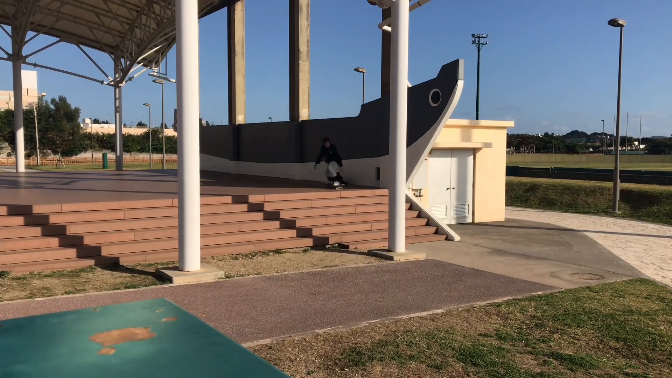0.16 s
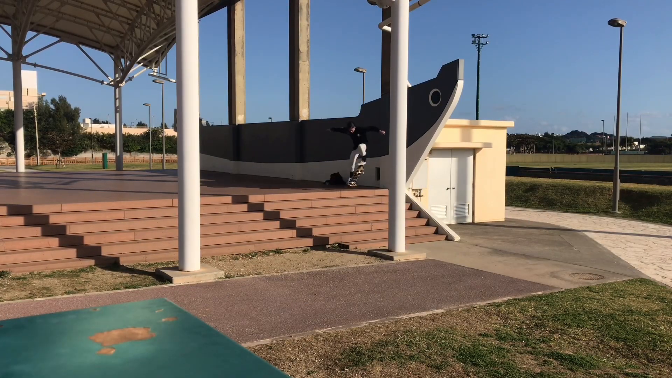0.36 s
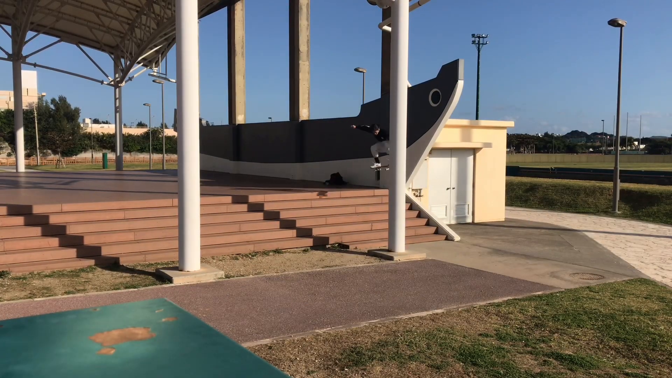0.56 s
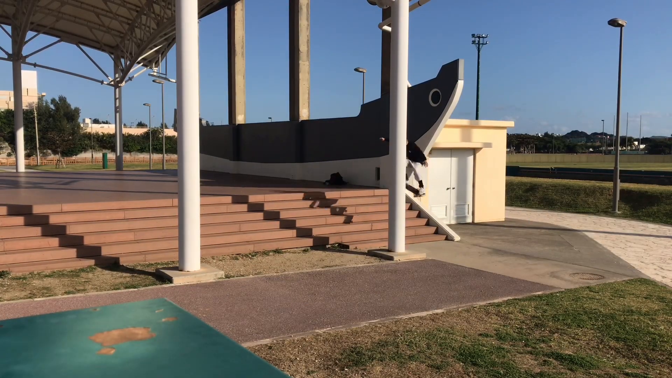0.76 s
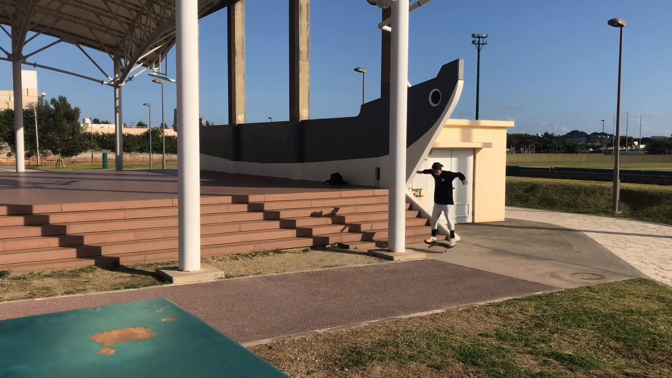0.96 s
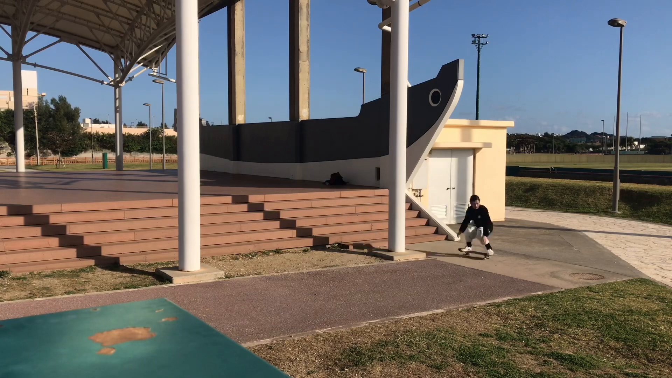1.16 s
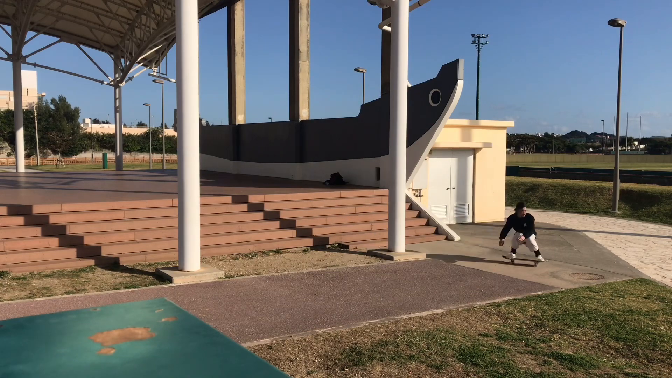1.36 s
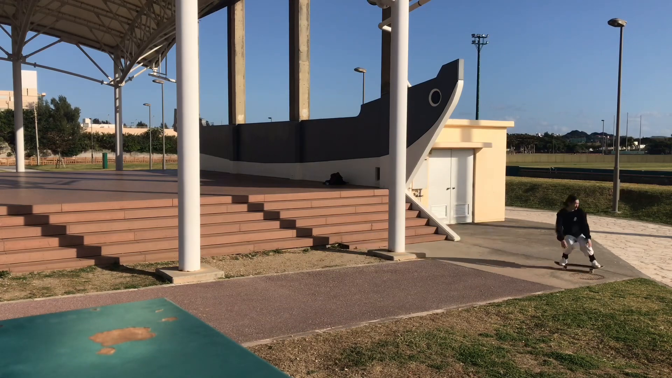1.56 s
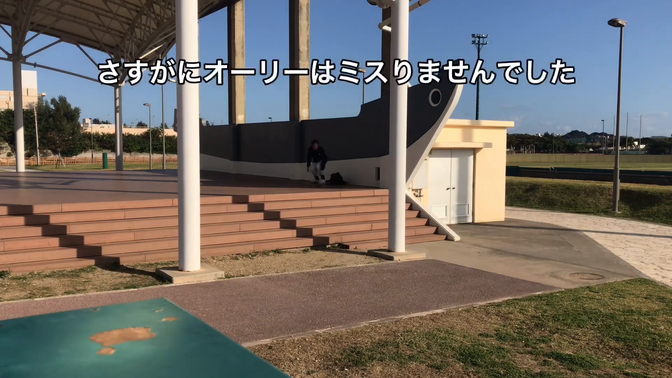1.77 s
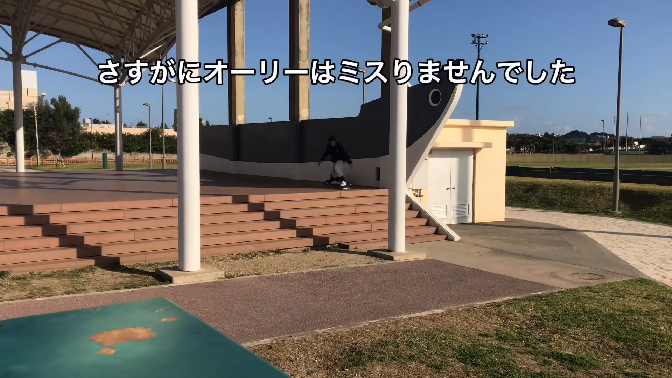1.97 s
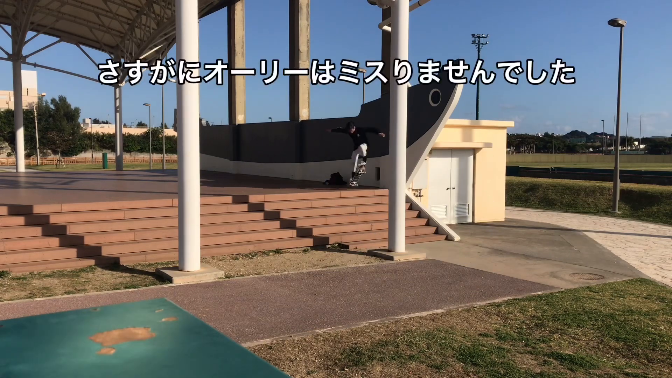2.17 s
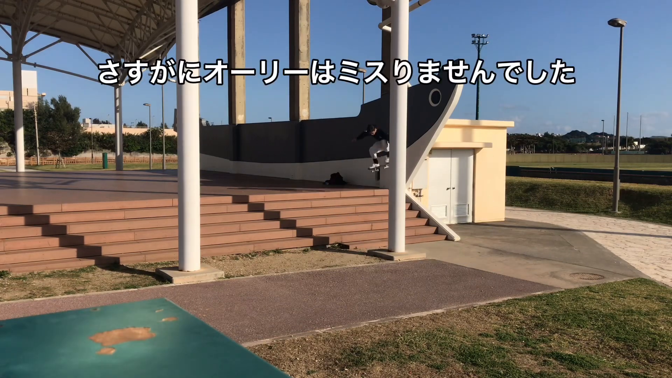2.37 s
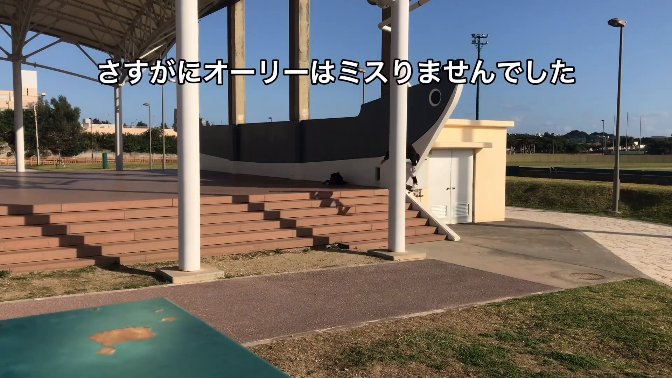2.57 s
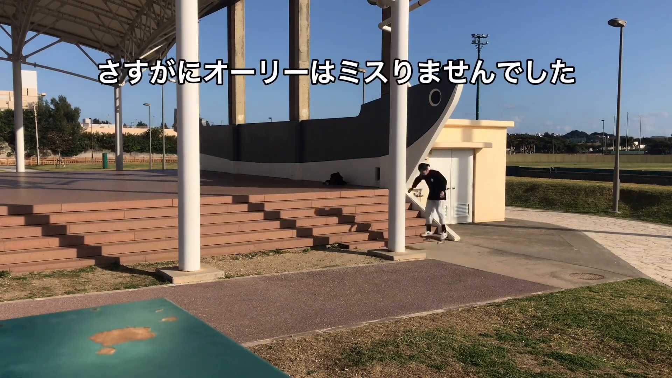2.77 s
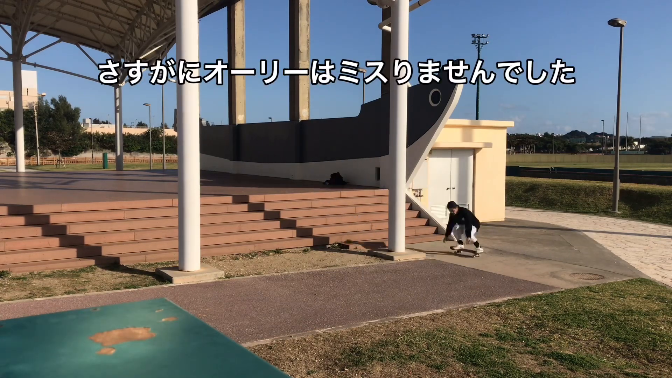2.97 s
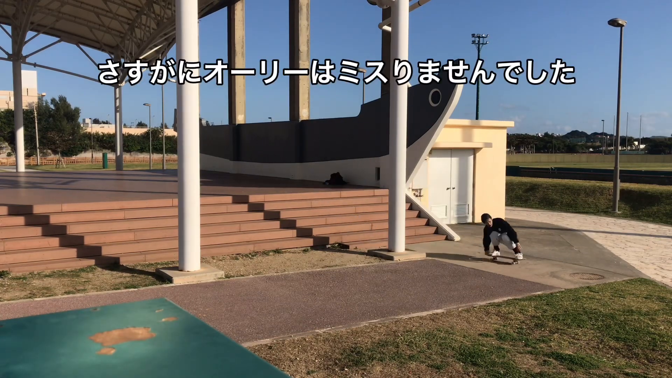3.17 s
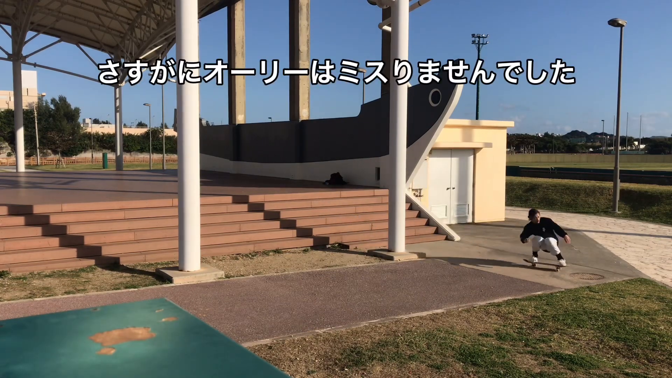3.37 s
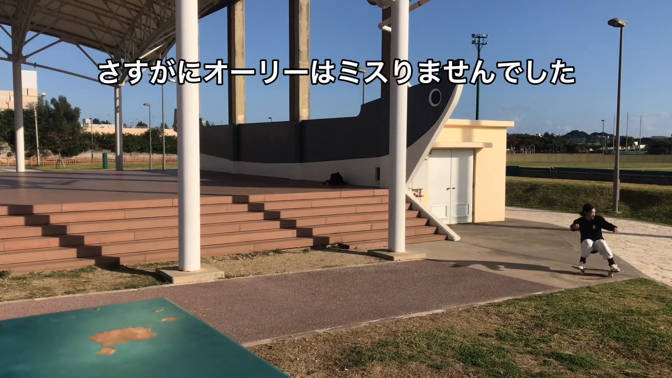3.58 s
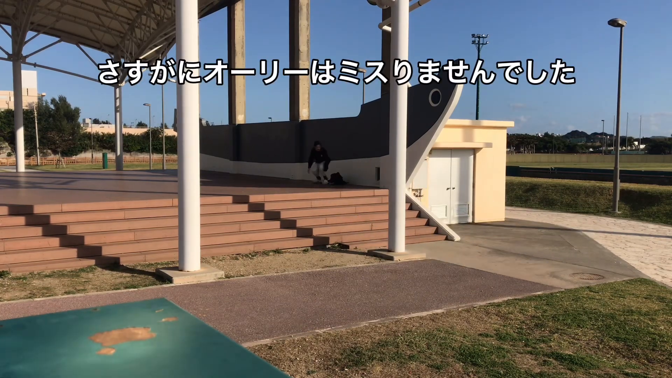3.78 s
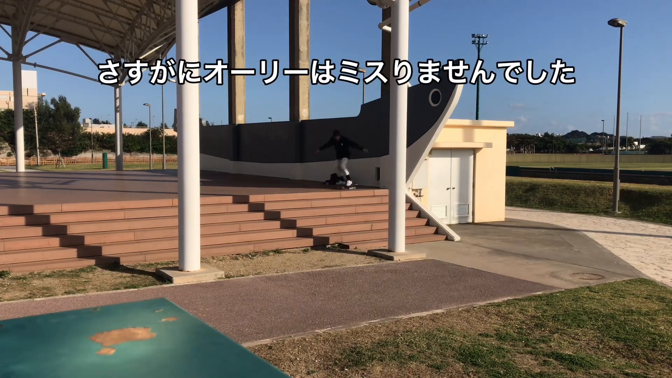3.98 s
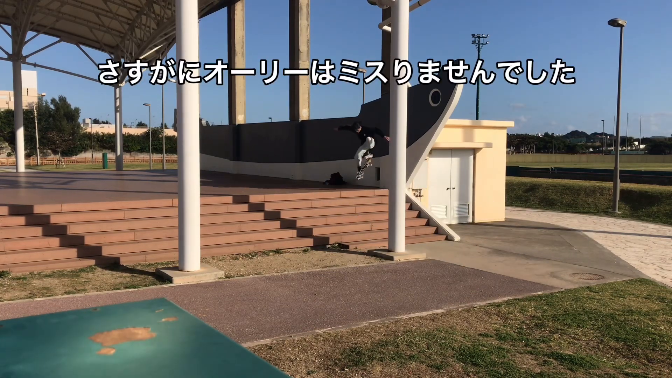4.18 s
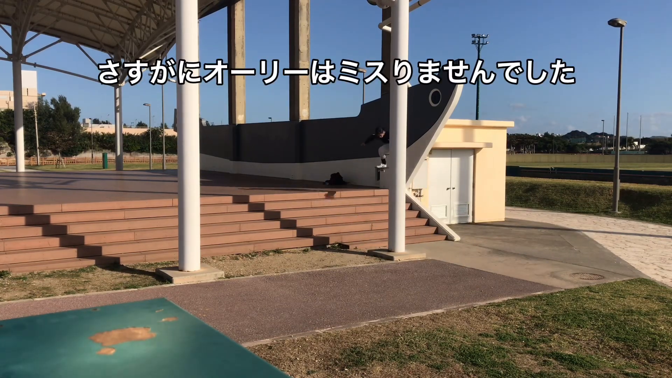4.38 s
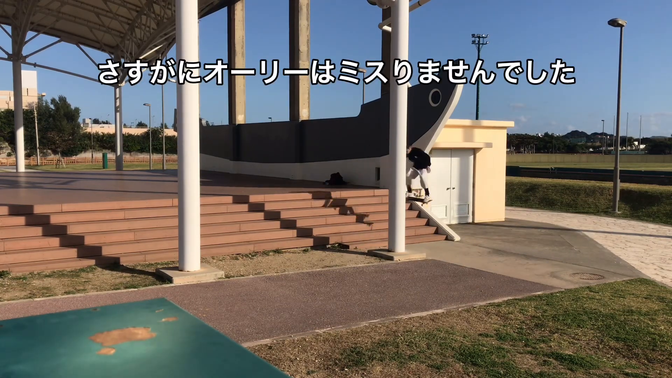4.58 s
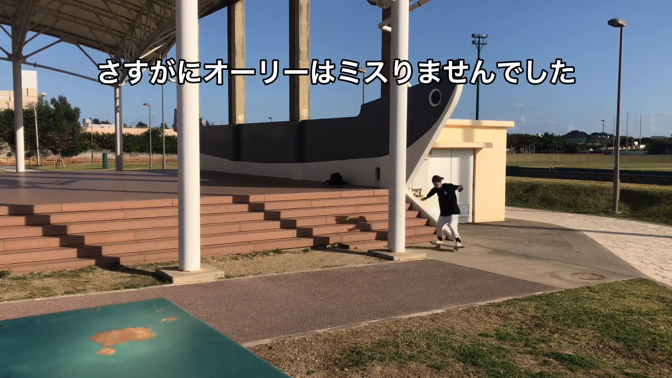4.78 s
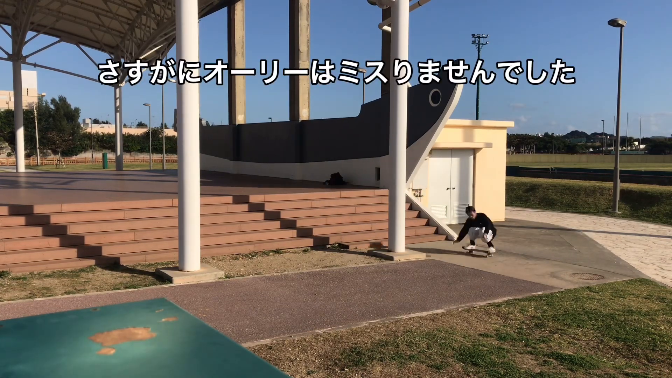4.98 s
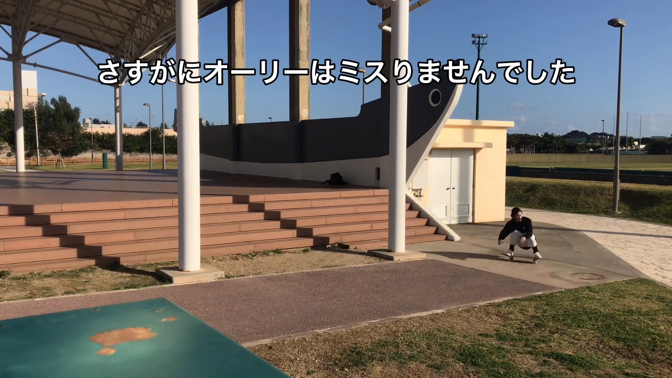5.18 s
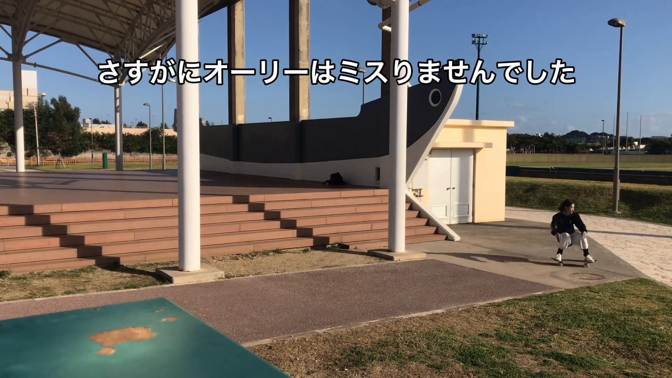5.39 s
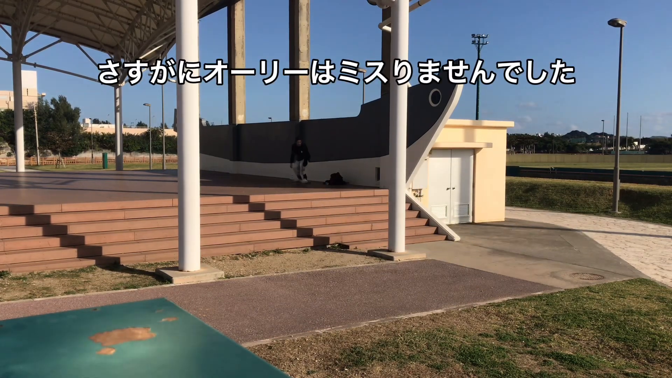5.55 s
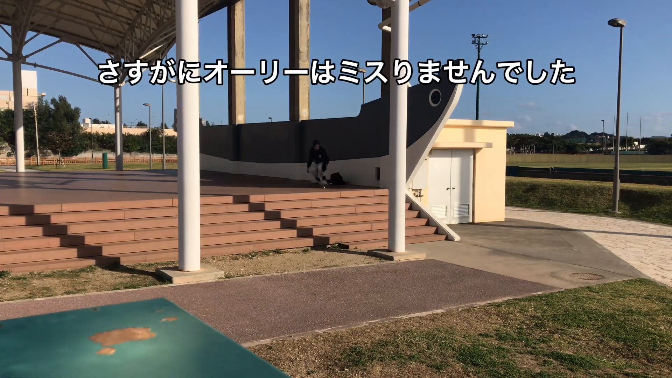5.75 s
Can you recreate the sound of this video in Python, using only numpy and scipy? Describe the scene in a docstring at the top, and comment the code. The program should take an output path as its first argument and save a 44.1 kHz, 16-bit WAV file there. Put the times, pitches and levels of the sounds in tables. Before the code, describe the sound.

A skateboard clatters over tile joints, pops sharply, slams down onto gritty concrete and rolls off, three times over, with wind buffeting the microphone.

```python
"""Skateboard ollies down outdoor stairs

A skateboarder jumps an outdoor stair set three times and starts a fourth run; the sound drops out briefly.
Shaped noise makes the wheels' hum and knocks on tile joints, then their roll over gritty concrete.
Short noise bursts and ringing wood make the popping tail and the slamming board.
Delayed copies and fading noise answer from the steps, walls and canopy.
Gusts and lone eddies, also shaped noise, buffet the microphone over a faint distant murmur."""
import sys
import numpy as np
from scipy import signal
from scipy.fft import rfft, irfft
from scipy.io import wavfile
from scipy.ndimage import uniform_filter1d

SR = 44100
rng = np.random.default_rng(int(sys.argv[2]) if len(sys.argv) > 2 else 0)


def store_wav(level_fs):
    """Save 16-bit WAV to argv[1]."""
    pcm = np.round(np.clip(np.atleast_2d(level_fs), -1, 1) * 32767)
    wavfile.write(sys.argv[1], SR, pcm.T.astype(np.int16))


N = 256662
TIME = np.arange(N) / SR
# Every level_db in the tables is relative: the function that plays it may add its own trim.
# Colour tables give the loudness of noise at each pitch, read between the rows.


def from_db(db):
    """Turn decibels into a gain."""
    return 10 ** (np.asarray(db) / 20)


def rms_one(x):
    """Scale to an average strength (rms) of 1."""
    return x / np.sqrt(np.mean(x ** 2) + 1e-20)


def at_hz(points, hz):
    """Read each column of a table at a pitch, on a log-frequency axis."""
    table_hz, *columns = np.transpose(points)
    return [np.interp(np.log(hz + 1e-9), np.log(table_hz), column) for column in columns]


def coloured(x, spectrum, size=8192):
    """Filter to a colour without sounding early (minimum phase); white noise keeps its power."""
    bins_hz = np.arange(size // 2 + 1) * SR / size
    gain = from_db(at_hz(spectrum, bins_hz)[0])
    # folding the cepstrum forward in time gives the minimum-phase filter
    cepstrum = irfft(np.log(gain))
    cepstrum[1:size // 2] *= 2
    cepstrum[size // 2 + 1:] = 0
    response = irfft(np.exp(rfft(cepstrum)))
    return signal.oaconvolve(x, response / np.linalg.norm(response))[:N]


def steadied(x, window_s):
    """Even out the slow swells of a noise."""
    power = uniform_filter1d(x ** 2, max(int(window_s * SR), 2))
    return x / np.sqrt(power + 1e-12)


def noise():
    """White noise of spread 1."""
    return rng.standard_normal(N)


def drift(rate_hz):
    """Smooth random wander of rms 1, changing about rate_hz times a second."""
    step = 40      # made at a fortieth of the sample rate, then joined by straight lines
    r = np.exp(-2 * np.pi * step * rate_hz / SR)
    raw = rng.standard_normal(N // step + 2002)
    slow = signal.lfilter([1], [1, -2 * r, r * r], raw)[2000:]      # skip the filter's start
    return np.interp(np.arange(N) / step, np.arange(len(slow)), rms_one(slow))


def burst(start_s, rise_s, fall_s):
    """Loudness curve that climbs to 1 after start_s, then dies away."""
    age = TIME - start_s
    out = np.zeros(N)
    live = (age > 0) & (age < rise_s + 10 * fall_s)
    rise = np.minimum(age[live] / rise_s, 1)
    out[live] = rise * np.exp(-np.maximum(age[live] - rise_s, 0) / fall_s)
    return out


def between(start_s, end_s, fade_s):
    """1 from start to end, with a short fade centred on each."""
    return np.clip(np.minimum(TIME - start_s, end_s - TIME) / fade_s + .5, 0, 1)


def ramp(start_s, length_s):
    """Climb from 0 to 1 and stay there."""
    return np.clip((TIME - start_s) / length_s, 0, 1)


def clicks(times_s, heights):
    """Blows one sample long."""
    out = np.zeros(N)
    places = np.round(np.asarray(times_s) * SR).astype(int)
    out[np.clip(places, 0, N - 1)] = heights
    return out


def ring(blows, hz, t60_s):
    """A unit blow sets a sine of height 1 ringing; it falls by 60 dB in t60_s."""
    r, w = from_db(-60 / (t60_s * SR)), 2 * np.pi * hz / SR
    return signal.lfilter([0, np.sin(w)], [1, -2 * r * np.cos(w), r * r], blows + 1e-18)


# gusts, each with the time it reaches full strength and how long it holds
# columns: full_s, hold_s, rumble_level_db, buffet_level_db
GUST_TABLE = [(0.01, 0.057, -29, -35), (0.276, 0.023, -29, -35.5), (0.45, 0.025, -36.5, -49),
              (0.58, 0.024, -46, -54), (0.745, 0.2, -39.5, -61), (1.005, 0.058, -33.5, -47.5),
              (1.811, 0.41, -31, -35.5), (2.308, 0.094, -28, -28.5), (2.445, 0.23, -25, -28),
              (2.723, 0.21, -26.5, -21.5), (3.033, 0.15, -27, -21.5), (3.407, 0.077, -26.5, -25.5),
              (3.562, 0.13, -27, -23.5), (3.975, 0.071, -32, -29), (4.22, 0.045, -34, -41),
              (4.46, 0.13, -37, -46.5), (4.708, 0.064, -27, -40), (5.216, 0.12, -34, -42),
              (5.565, 0.096, -29.5, -34.5), (5.76, 0.06, -35, -43)]
GUST_ATTACK_S, GUST_RELEASE_S = 0.046, 0.055
BREEZE_RUMBLE_DB, BREEZE_BUFFET_DB = -45.5, -58      # the light air between gusts


def gust_levels():
    """Gusts swell, hold and die away over a steady breeze; returns rumble and buffeting levels in dB."""
    power = from_db([[BREEZE_RUMBLE_DB], [BREEZE_BUFFET_DB]]) ** 2
    for full_s, hold_s, low_db, high_db in GUST_TABLE:
        swell = ramp(full_s - GUST_ATTACK_S, GUST_ATTACK_S)
        shape = swell * np.exp(-np.maximum(TIME - full_s - hold_s, 0) / GUST_RELEASE_S)
        power = power + (from_db([[low_db], [high_db]]) * shape) ** 2
    return 10 * np.log10(power)


# colour of the deep wind rumble
# columns: pitch_hz, level_db
WIND_COLOUR = [(12, -27), (25, -13), (50, 9), (80, 10.5), (105, 1.5), (160, -20.5), (400, -72.5)]


def wind(corner_hz=270, db_per_octave=19, steepness=3.26, rumble_db=-2.0, buffet_db=-1.5,
         lumps_db=1.5, flutter_db=3.0):
    """Eddies at the microphone: a harder gust makes smaller eddies, so the buffeting reaches higher."""
    low_db, gust_db = gust_levels()
    lumps = lumps_db * drift(68)
    corner = corner_hz * 2 ** ((gust_db + lumps + 27.5) / db_per_octave)
    edges_hz = np.geomspace(98, 1700, 11)
    white = noise(), noise()      # neighbouring bands take turns, so they stay unrelated
    buffet = 0
    for k, band in enumerate(zip(edges_hz, edges_hz[1:])):
        band_filter = signal.butter(4, band, "band", fs=SR, output="sos")
        eddies = signal.sosfilt(band_filter, white[k % 2])
        height = np.sqrt(band[0] * band[1]) / corner      # band centre compared with the corner
        buffet = buffet + eddies / np.sqrt(height * (1 + height ** (2 * steepness)))
    buffet = steadied(buffet, 0.067) * from_db(gust_db + buffet_db + lumps)
    rumble_gain = from_db(low_db + rumble_db + flutter_db * drift(9.9))
    rumble = rumble_gain * steadied(coloured(noise(), WIND_COLOUR), 0.051)
    return buffet + rumble


# colour of the faint sound from far off
# columns: pitch_hz, level_db
DISTANCE_COLOUR = [(30, -3.5), (200, -4), (650, -4.5), (1000, -5), (1600, -10.5), (2900, -23.5),
                   (4200, -20.5), (5100, -27), (6300, -22), (8000, -27), (10200, -30.5), (11300, -24),
                   (16000, -39)]


def distant_murmur(level_db=-55.0):
    """Steady coloured noise stands for everything far off."""
    return from_db(level_db) * coloured(noise(), DISTANCE_COLOUR)


# pace of each approach over the tiles
# columns: first_joint_s, joint_gap_s, crouch_s
PACES = [(0.043, 0.0318, 0.19), (1.7808, 0.0338, 2.005), (3.783, 0.0338, 3.937), (5.5515, 0.034, 5.9)]
# the crouch drives the board ahead: how long, and its share of the time between joints
CROUCH_S, CROUCH_GAP = 0.115, 0.895
# springing up, the rider holds back and unloads the board: slower joints, less hum and knock, sharper ticks
SPRING_GAP = 1.16
SPRING_HUM_DB, SPRING_KNOCK_DB, SPRING_TICK_DB = -2, -5, 4.5
LIFT_S = 0.01      # no joints are struck in this last moment before the pop
JOINT_SCATTER_DB = 0.65      # no two joints are alike


def joints(pace, knock_db, tick_db, end_s, count=24):
    """Evenly spaced joints pass under a board that cruises, speeds up and slows: s, knock dB, tick dB."""
    s, gap_s, crouch_s = pace
    phases = [(1, 0, 0), (CROUCH_GAP, 0, 0), (SPRING_GAP, SPRING_KNOCK_DB, SPRING_TICK_DB)]
    rows = []
    for knock_luck, tick_luck in JOINT_SCATTER_DB * rng.standard_normal((count, 2)):
        phase = int(s > crouch_s) + int(s > crouch_s + CROUCH_S)
        stretch, heavier_db, sharper_db = phases[phase]
        if s < end_s:
            rows.append((s, knock_db + heavier_db + knock_luck, tick_db + sharper_db + tick_luck))
        s += gap_s * stretch
    return rows


# loudness of each approach
# columns: hum_level_db, knock_level_db, tick_level_db
APPROACH_LEVELS = [(-29, -20, -51.5), (-32.5, -20.5, -51.5), (-32.5, -23, -53.5), (-31.5, -21, -50)]
# colour of wheels humming on tiles
# columns: pitch_hz, level_db
TILE_COLOUR = [(60, -32), (150, -5), (330, 6), (430, -9.5), (560, 2), (950, -5), (1500, -10), (2100, -16.5),
               (4000, -29.5), (6300, -35.5), (7700, -48), (10000, -74), (16000, -58)]
# colour of a wheel knocking over a joint
# columns: pitch_hz, level_db
KNOCK_COLOUR = [(200, -19.5), (450, -2), (650, 2), (1100, 0), (1600, -9.5), (2300, -14.5), (4000, -24),
                (8000, -50)]
# colour of the sharp tick at a joint, and of the scuff
# columns: pitch_hz, level_db
TICK_COLOUR = [(500, 2), (2000, 4.5), (4000, 2.5), (6000, 5.5), (7700, -2), (9200, 3.5), (12000, -1),
               (16000, -11)]


def run_up(hum_db=-4.0, knock_db=-7.5, tick_db=5.5, second_wheel_s=0.0054, second_wheel_db=-5.0,
           scuff_db=-58.5):
    """Wheels hum on tiles; each joint knocks the board and ticks at two wheels; unloaded wheels scuff."""
    ends_s = [row[0] for row in TAIL_POPS] + [N / SR + LIFT_S]      # the last run has no pop
    load, unloaded, crossed = 0, 0, []
    for pace, levels, dropout, end_s in zip(PACES, APPROACH_LEVELS, DROPOUTS, ends_s):
        level_db, heavy_db, sharp_db = levels
        spring_s = pace[2] + CROUCH_S
        hum_gain = from_db(level_db + SPRING_HUM_DB * ramp(spring_s, .1))
        load = load + hum_gain * between(dropout[0], end_s, 0.042)
        unloaded = unloaded + between(spring_s, end_s, 0.02)
        crossed += joints(pace, heavy_db, sharp_db, end_s - LIFT_S)
    hum = from_db(hum_db) * load * coloured(noise(), TILE_COLOUR)

    rise_s = .002
    knocks = sum(from_db(db) * burst(s + rise_s / 2, rise_s, 0.0098) for s, db, _ in crossed)
    knocking = from_db(knock_db) * knocks * steadied(coloured(noise(), KNOCK_COLOUR), 0.0079)
    ticks = 0
    for lag_s, wheel_db in ((rise_s / 2, 0), (second_wheel_s, second_wheel_db)):
        shape = sum(from_db(db + wheel_db + tick_db) * burst(s + lag_s, rise_s, 0.0041)
                    for s, _, db in crossed)
        ticks = ticks + noise() * shape
    scuff = from_db(scuff_db) * unloaded * noise()
    return hum + knocking + coloured(ticks + scuff, TICK_COLOUR)


# single reflections from the steps, the wall and the roof
# columns: delay_s, level_db
REFLECTIONS = [(.0075, -20.5), (.021, -20), (0.051, -24), (0.157, -30.5), (.214, -36)]


def slaps(x, dull_hz=4500):
    """A few flat surfaces each return one duller, later copy."""
    lowpass = signal.butter(2, min(dull_hz, SR / 3), fs=SR, output="sos")
    dull = signal.sosfilt(lowpass, x)
    return sum(from_db(db) * np.interp(TIME - delay_s, TIME, dull, left=0) for delay_s, db in REFLECTIONS)


# lingering echoes under the canopy; t60_s is the time to fall by 60 dB
# columns: pitch_hz, level_db, t60_s
CANOPY_ECHOES = [(100, 1, 1.1), (1070, -10, 0.97), (3020, -11.5, 0.8), (6000, -15, 0.46), (14800, -5, 0.25)]
# lingering echoes of the steps and walls
# columns: pitch_hz, level_db, t60_s
WALL_ECHOES = [(101, -41, 0.32), (370, 1.5, 0.13), (700, 0.5, 0.52), (1400, -0.5, 0.42), (2200, -7, 0.49),
               (3200, -6.5, 0.48), (6040, -10.5, 0.37), (15000, -14, 0.26)]


def echoes(x, table, build_s, count=16):
    """A moving board varies every reflection, so only energy lingers: fresh noise follows it by band."""
    edges_hz = np.geomspace(100, 18000, count + 1)
    white = noise(), noise()
    out, build = 0, np.exp(-1 / (build_s * SR))
    for k, band in enumerate(zip(edges_hz, edges_hz[1:])):
        db, t60_s = at_hz(table, np.sqrt(band[0] * band[1]))
        band_filter = signal.butter(2, band, "band", fs=SR, output="sos")
        keep = from_db(-60 / (t60_s * SR)) ** 2      # share of the energy left after one sample
        power = signal.sosfilt(band_filter, x + 1e-9 * white[0]) ** 2
        energy = signal.lfilter([(1 - keep) * (1 - build)], np.poly([keep, build]), power)
        wash = rms_one(signal.sosfilt(band_filter, white[k % 2]))
        out = out + from_db(db) * np.sqrt(np.abs(energy)) * wash
    return out


# the tail striking the tiles; the pitch is that of a short ping in the crack
# columns: start_s, level_db, pitch_hz
TAIL_POPS = [(0.4355, -7.5, 3405), (2.2614, -5, 3800), (4.1680, -5.5, 4250)]
# colour of the crack
# columns: pitch_hz, level_db
CRACK_COLOUR = [(300, -30), (900, 4), (1300, 3), (1900, 1.5), (3500, 3), (5500, -3.5), (6800, -8.5),
                (7900, -15.5), (12000, -19.5), (16000, -28)]
# ways the free tail rings; t60_s is the time to fall by 60 dB
# columns: pitch_hz, level_db, t60_s
TAIL_MODES = [(507, -30, 0.19), (1160, -20, 0.034), (1391, -11, 0.048), (1505, -32, 0.063),
              (2140, -33, 0.018), (3110, -17, 0.035), (4170, -26, 0.046)]


def pops(scatter_db=-21.5, crack_db=-5.5, ping_db=-3.0, wood_db=0.0, second_db=-11.5, second_hz=5600):
    """The tail cracks, strikes again a millisecond later and rings; near surfaces scatter the crack.

    Returns the crack and the wood ring."""
    s, db, _ = np.transpose(TAIL_POPS)
    strike = sum(from_db(d + crack_db) * burst(t, 0.0003, 0.00056) for t, d, _ in TAIL_POPS)
    scatter = sum(from_db(d + scatter_db) * burst(t, 0.0011, 0.017) for t, d, _ in TAIL_POPS)
    crack = (strike + scatter) * steadied(coloured(noise(), CRACK_COLOUR), 0.0014)
    ping = sum(ring(clicks([t], from_db(d + ping_db)), hz, 0.0047) for t, d, hz in TAIL_POPS)
    second_strike = ring(clicks(s + 0.001017, from_db(db + second_db)), second_hz, 0.0089)
    blows = clicks(s, from_db(db + wood_db))
    wood = 0
    for k, (hz, level_db, t60_s) in enumerate(TAIL_MODES):
        wood = wood + from_db(level_db) * ring(blows, hz, t60_s) * (-1) ** k
    contact = signal.butter(4, 7500, fs=SR, output="sos")      # wood is too soft to pass the very top
    return crack + signal.sosfilt(contact, ping + second_strike), wood


# wheels, deck and feet slamming down; the pitch rings most; thud and crunch add to the level
# columns: start_s, level_db, pitch_hz, thud_db, crunch_db
CONTACTS = [(1.0915, -17, 1070, 8, 1.5), (1.0942, -8, 1700, -3.5, -0.5), (1.1005, -10, 1550, -6, -3),
            (1.1060, -28, 1016, 7, 4.5), (1.1115, -16, 770, 2.5, 3.5), (2.9301, -19.5, 1030, 2.5, 9),
            (2.9325, -9.5, 1640, 0.5, -4.5), (2.9368, -13.5, 1060, 2.5, -11), (2.9435, -12, 560, -3, -6.5),
            (2.9490, -28, 543, 2, -18), (4.8365, -10.5, 1340, 3.5, -5.5), (4.8427, -9.5, 780, -8, -2.5),
            (4.8481, -18.5, 540, 6, -5), (4.8506, -10.5, 857, -11, -3.5)]
# colour of the thud
# columns: pitch_hz, level_db
THUD_COLOUR = [(50, -5), (150, -11), (380, -19.5), (520, -0.5), (1000, 3), (1700, 1), (2200, -0.5),
               (3300, 0.5), (5000, -8.5), (16000, -113)]
# colour of the crushed grit
# columns: pitch_hz, level_db
CRUNCH_COLOUR = [(800, 9), (2500, 2), (4000, 0), (6000, 5.5), (8000, 0), (11000, -2.5), (16000, -9)]
# ways the loaded deck and trucks ring; t60_s is the time to fall by 60 dB
# columns: pitch_hz, level_db, t60_s
DECK_MODES = [(317, 9, 0.27), (521, 13, 0.07), (691, -0.5, 0.27), (708, -14, 0.051), (894, 0, 0.2),
              (1066, 5.5, 0.2), (1300, -1, 0.11), (1464, -0.5, 0.25), (1688, 9, 0.055), (2140, -15, 0.0326),
              (2756, 4, 0.2), (3495, 19, 0.016)]


def landings(thud_db=-7.0, crunch_db=-5.0, ring_db=-7.5, focus_octaves=0.26, other_modes=0.12):
    """A quick volley of contacts thuds, crushes grit and rings the deck. Returns crash and wood ring."""
    s, db, ring_hz, heavy_db, bright_db = np.transpose(CONTACTS)
    thud = sum(from_db(d) * burst(t, 0.0001, 0.006) for t, d in zip(s, db + heavy_db))
    crunch = sum(from_db(d) * burst(t, 0.00021, 0.0051) for t, d in zip(s, db + bright_db))
    crash = from_db(thud_db) * thud * steadied(coloured(noise(), THUD_COLOUR), 0.0084)
    crash += coloured(from_db(crunch_db) * crunch * noise(), CRUNCH_COLOUR)
    wood = 0
    for hz, level_db, t60_s in DECK_MODES:
        # the point of contact favours the modes near its own pitch
        octaves_off = np.log2(hz / ring_hz)
        share = other_modes + np.exp(-(octaves_off / focus_octaves) ** 2)
        arrival_s = s + rng.random(len(s)) / hz      # bending waves reach each mode within one cycle
        heights = from_db(db + level_db + ring_db) * share * .5
        wood = wood + ring(clicks(arrival_s, heights), hz, t60_s)
    return crash, wood


# rolling away, then leaning into a turn, which changes both levels by the last two columns
# columns: rumble_level_db, grit_level_db, turn_start_s, turn_rumble_db, turn_grit_db
ROLLS = [(-42, -60.5, 1.2, -1, 4.5), (-46.5, -57, 3.477, 7.5, 12), (-43, -59.5, 5.01, 0.5, 7)]
# colour of the board shaking on concrete
# columns: pitch_hz, level_db
CONCRETE_COLOUR = [(80, -4.5), (330, 3), (430, 1.5), (660, 7), (800, 0), (1500, 2), (2050, -3), (2500, -15),
                   (4000, -17.5), (16000, -70)]
# colour of sand under the wheels
# columns: pitch_hz, level_db
GRIT_COLOUR = [(800, -31), (2000, 7.5), (3100, 4.5), (4400, -5), (5900, 6), (7500, -1.5), (11000, -4.5),
               (16000, -9.5)]
LEAN_S = 0.15      # time to lean fully into the turn


def roll_out(rumble_db=1.5, grit_db=2.5, grains_per_s=3500, spread_db=3.0):
    """Rough concrete shakes the board while sand grains crackle, louder in the turn."""
    rumble, grit = 0, 0
    for roll, pop, dropout in zip(ROLLS, TAIL_POPS, DROPOUTS[1:]):
        low_db, high_db, turn_s, low_gain_db, high_gain_db = roll
        touchdown_s = min(row[0] for row in CONTACTS if row[0] > pop[0])
        lean = ramp(turn_s, LEAN_S)
        rolling = between(touchdown_s + 0.057, dropout[0] + 0.016, 0.006)
        rumble = rumble + from_db(low_db + low_gain_db * lean) * rolling
        grit = grit + from_db(high_db + high_gain_db * lean) * rolling
    shake = rumble * from_db(rumble_db + 1.9 * drift(11.3)) * noise()

    sizes = from_db(spread_db * np.minimum(rng.exponential(1, N), 5)) * rng.choice([-1, 1], N)
    grains = sizes * (rng.random(N) < grains_per_s / SR)
    sand = rms_one(rms_one(grains) + 0.4 * noise())
    crackle = from_db(grit_db + 1.2 * drift(37)) * grit * sand
    return coloured(shake, CONCRETE_COLOUR) + coloured(crackle, GRIT_COLOUR)


# stones snapping under the wheels
# columns: start_s, level_db
STONE_HITS = [(1.5823, -28), (1.707, -50), (3.4186, -26.5), (3.5358, -25), (3.552, -23), (3.5806, -13.5),
              (3.686, -14), (3.6956, -19), (5.4618, -14)]
# colour of a snap
# columns: pitch_hz, level_db
SNAP_COLOUR = [(800, -0.5), (1600, -11), (2050, 16), (2600, -2.5), (3100, -5), (4400, -4.5), (5900, -1),
               (8000, -11.5), (16000, -19)]


def stones(level_db=-9.0):
    """Each stone snaps under a wheel as a very short burst of noise."""
    snaps = sum(from_db(db + level_db) * burst(s, 0.00047, 0.0027) for s, db in STONE_HITS)
    return coloured(snaps * noise(), SNAP_COLOUR)


# single eddies bursting on the microphone; the edge, before scaling, sets how high each reaches
# columns: start_s, level_db, upper_edge_hz
EDDIES = [(1.82, -20.5, 133), (2.487, -27, 505), (2.705, -31, 657), (2.801, -27, 640), (2.857, -24, 674),
          (3.097, -21.5, 616), (3.41, -19.5, 418), (4.732, -28, 200), (5.208, -17, 112.7),
          (5.24, -22.5, 234), (5.342, -26, 170)]


def puffs(fall_s=0.014, level_db=-2.5, reach=1.11):
    """A lone eddy is a brief lump of pressure; the smaller it is, the higher it reaches."""
    out, white = 0, noise()
    for s, db, edge_hz in EDDIES:
        band_filter = signal.butter(5, [50, reach * edge_hz], "band", fs=SR, output="sos")
        lump = steadied(signal.sosfilt(band_filter, white), 0.054)
        out = out + from_db(db + level_db) * burst(s, 2 / edge_hz, fall_s) * lump
    return out


def scene():
    """The stage lies under the canopy; the landing is in the open, beside the steps and walls."""
    air = wind() + distant_murmur()
    rolling = run_up()
    crack, tail = pops()
    crash, deck = landings()
    direct = rolling + crack + tail + crash + deck + roll_out() + stones()
    under_roof = from_db(-2.0) * (crack + tail) + from_db(0.5) * rolling + from_db(-9.5) * crash
    roof = echoes(under_roof, CANOPY_ECHOES, 0.0057)
    walls = echoes(from_db(-2.5) * crash + from_db(-5.0) * deck, WALL_ECHOES, 0.0054)
    return (direct + slaps(direct) + roof + walls + air + puffs())[None]


# brief moments when the sound drops out
# columns: start_s, end_s
DROPOUTS = [(0.022, 0.034), (1.751, 1.767), (3.737, 3.757), (5.528, 5.556)]
CUTOFF_HZ = 16000


def record(dry):
    """The highest peaks are rounded, the sound drops by 50 dB in each dropout, and the top is cut."""
    top = .8      # the rounded peaks never pass this height
    rounded = dry / (1 + (dry / top) ** 4) ** .25
    silent = np.clip(sum(between(start_s, end_s, 0.0032) for start_s, end_s in DROPOUTS), 0, 1)
    heard = rounded * (1 - silent * (1 - from_db(-50)))
    lowpass = signal.ellip(10, .2, 80, CUTOFF_HZ, fs=SR, output="sos")
    return signal.sosfilt(lowpass, heard)


dry = scene()
out = record(dry)
store_wav(out)
```